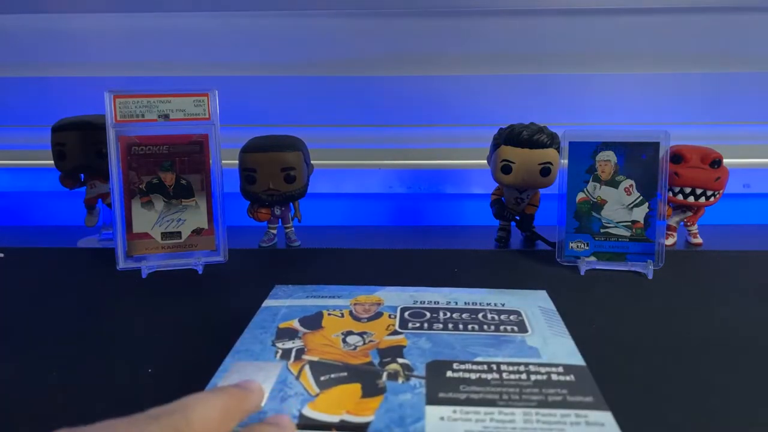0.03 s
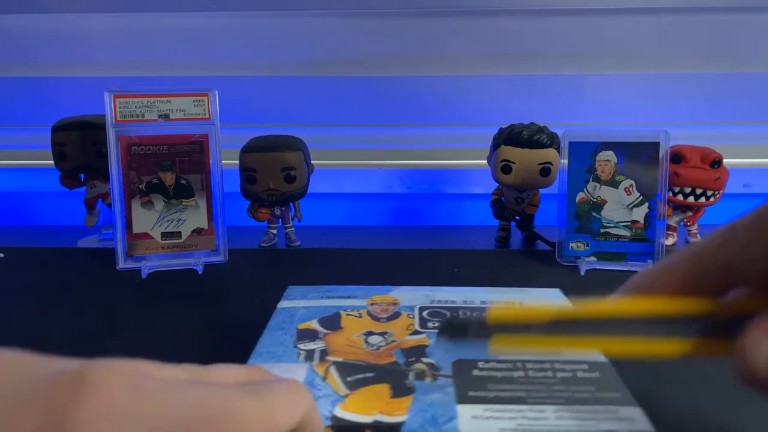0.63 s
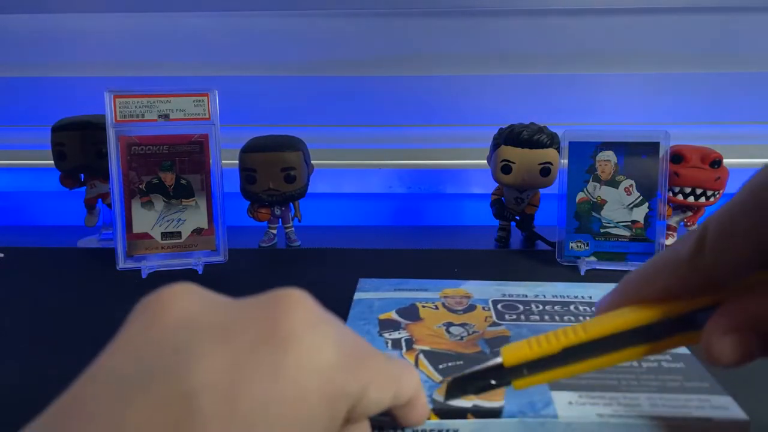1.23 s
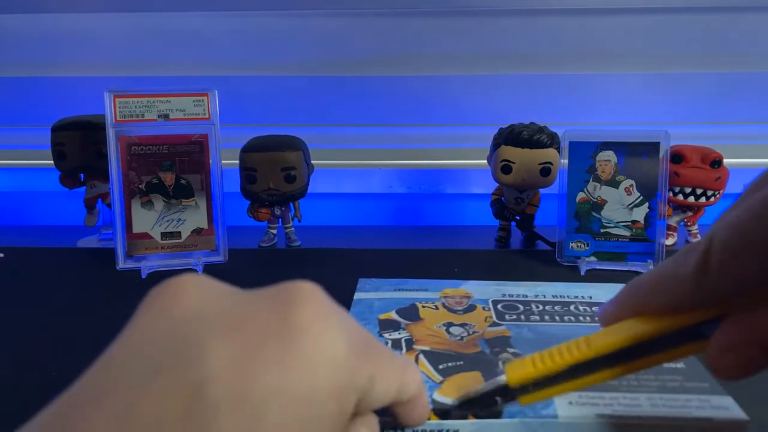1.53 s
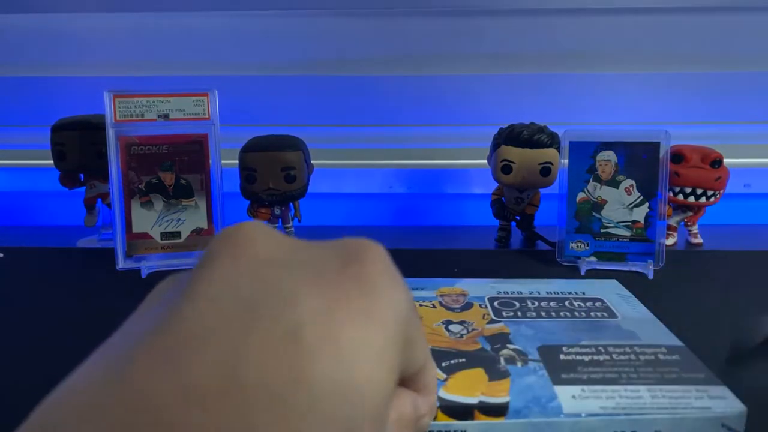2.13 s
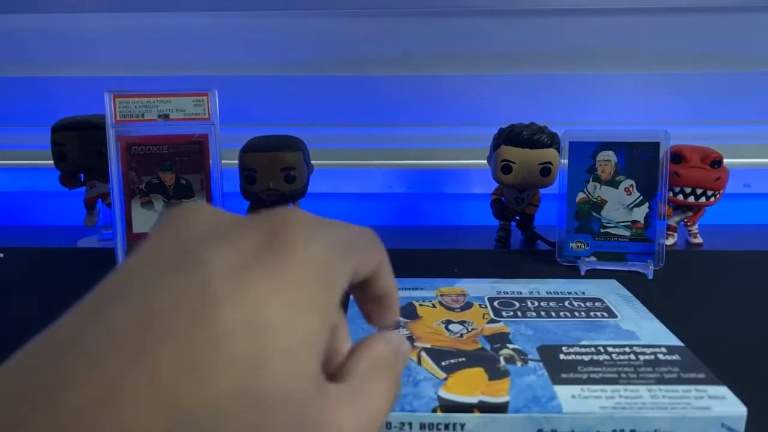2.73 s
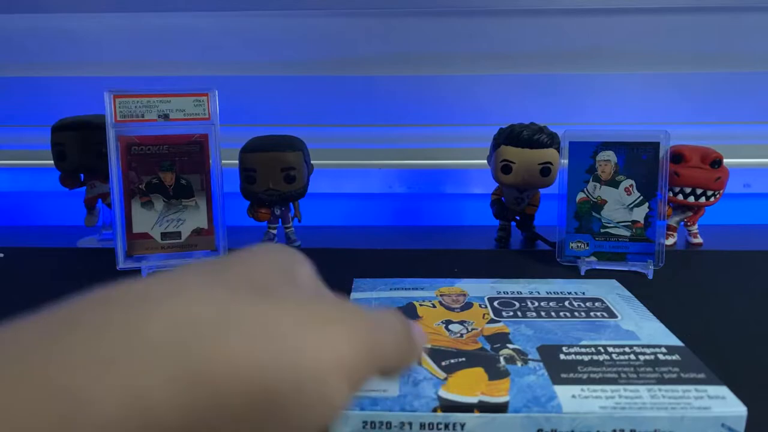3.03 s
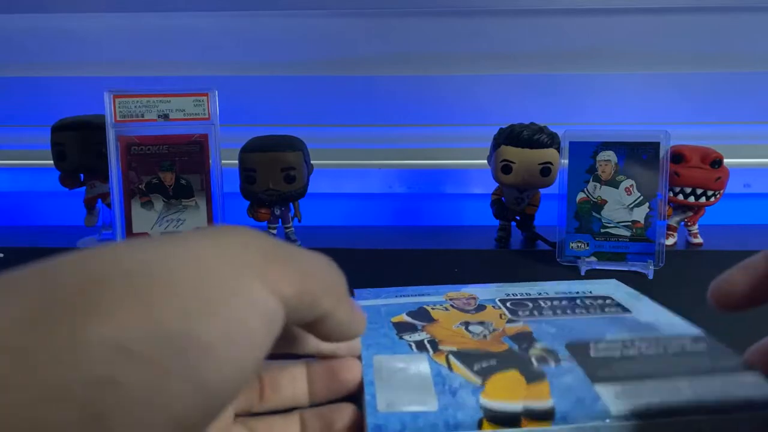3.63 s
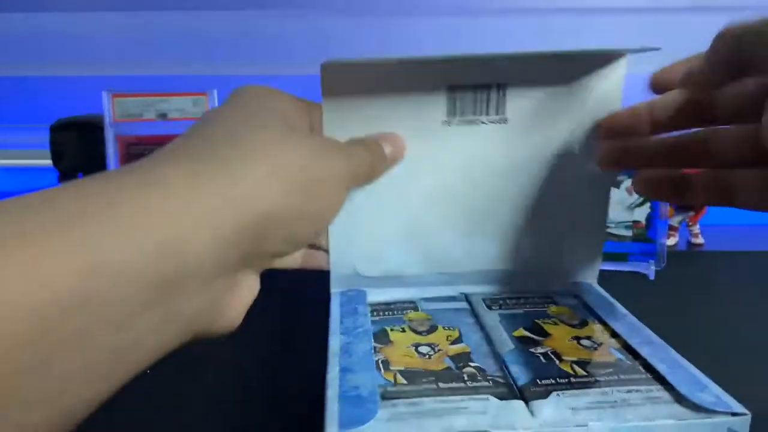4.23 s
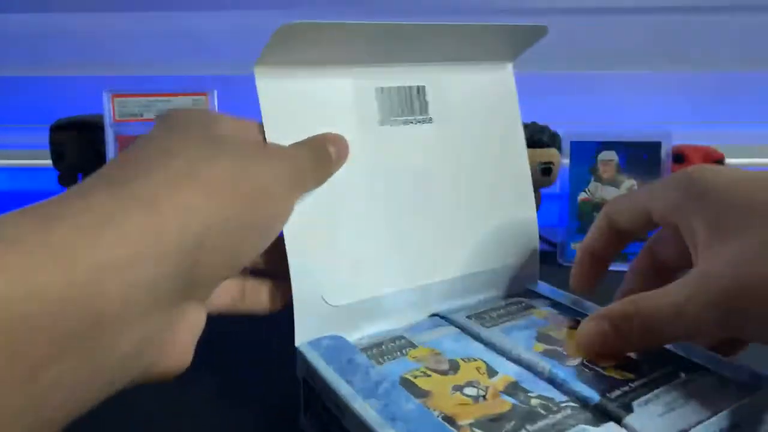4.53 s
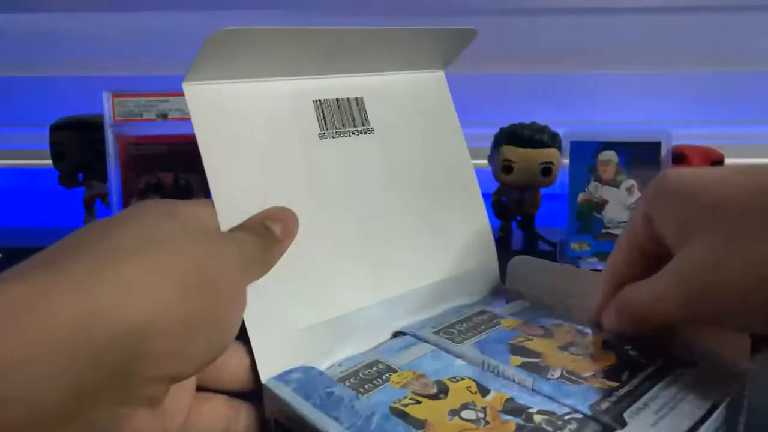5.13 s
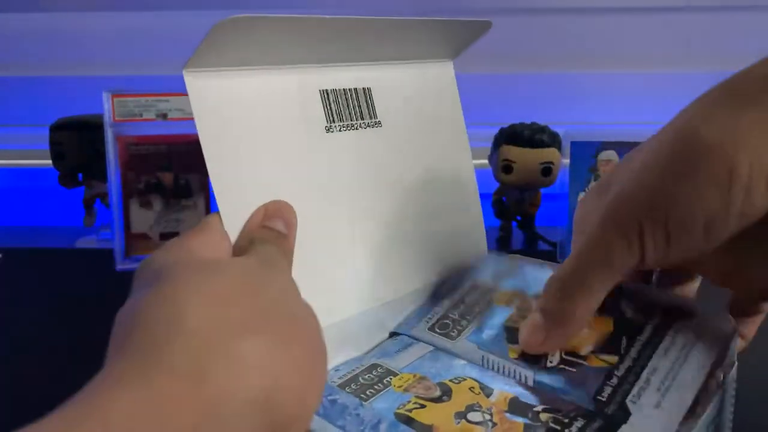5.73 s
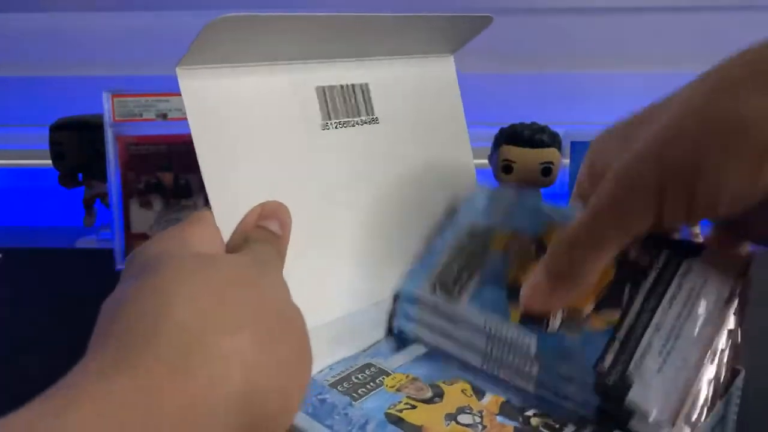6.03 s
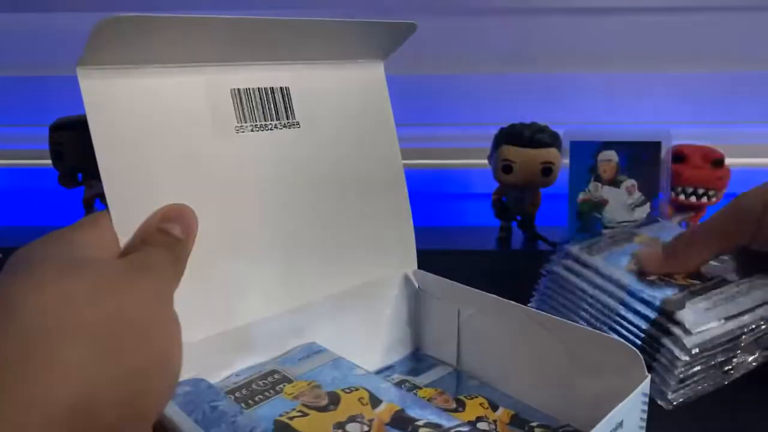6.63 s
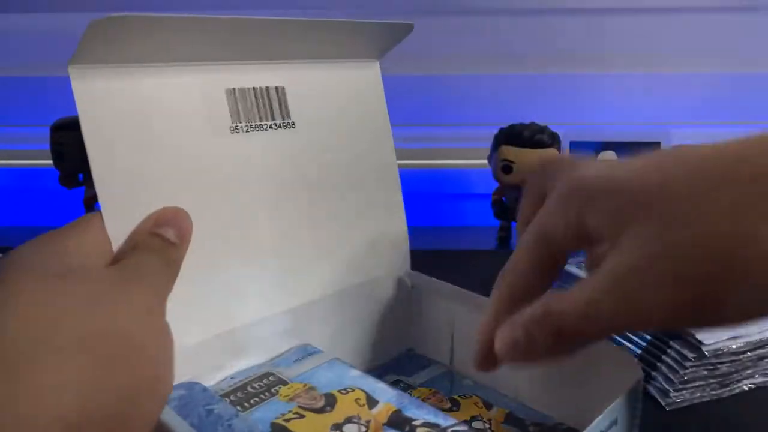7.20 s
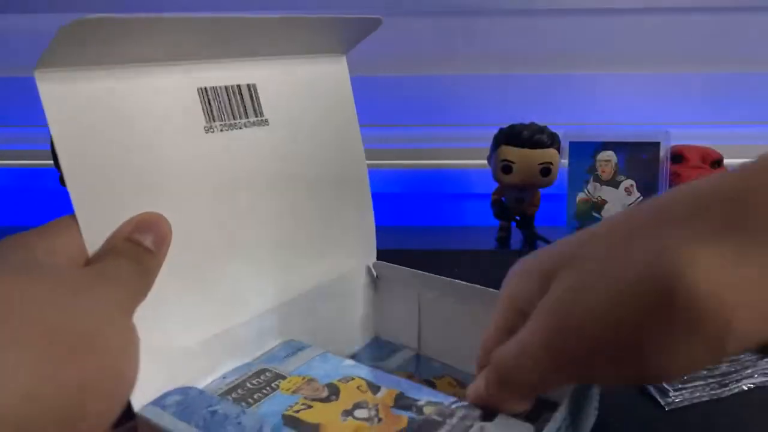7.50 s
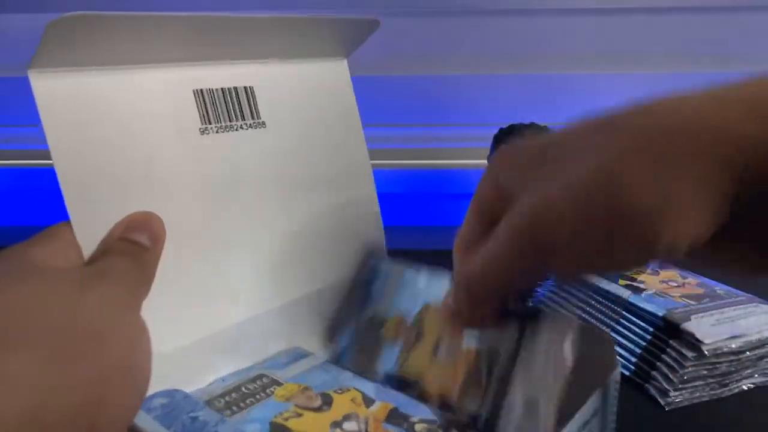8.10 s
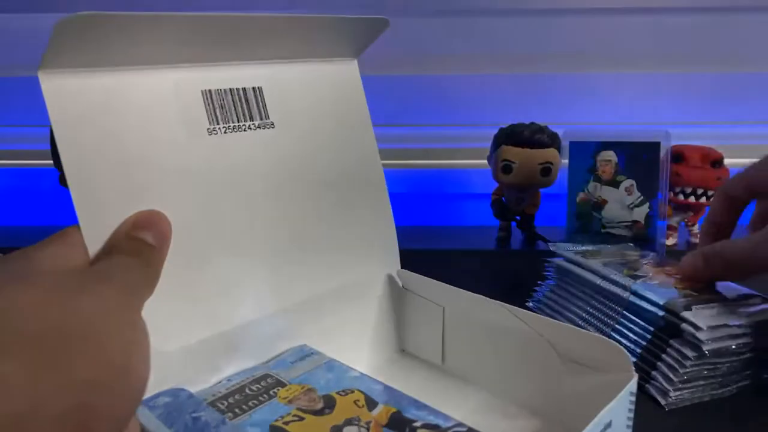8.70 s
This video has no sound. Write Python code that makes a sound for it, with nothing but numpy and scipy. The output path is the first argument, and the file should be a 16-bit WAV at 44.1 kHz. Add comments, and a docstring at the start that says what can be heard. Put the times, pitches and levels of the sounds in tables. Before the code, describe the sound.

A utility knife's slider ticks out over its notches, the blade makes a short slit, and it retracts in a quick run of clicks. Loud cardboard snaps, a scrape and low thumps follow as a box is opened on a desk. Foil packs then slide against its walls and crinkle as two stacks are lifted out and laid aside. Everything is heard close up over a faint, low room tone.

```python
"""A cardboard box of trading cards is opened on a desk, close up, in a small room.
Fingers rub and tap it; a utility knife ratchets out over its notches, slits the seal and clicks back.
The cardboard cracks, its panels ring and the lid scrapes open in grains of stick-slip friction.
Two stacks of foil packs are dragged out, ticking as their creases buckle, and set down with soft thumps."""
import sys
import numpy as np
from scipy import signal
from scipy.fft import next_fast_len
from scipy.io import wavfile

SR = 44100
rng = np.random.default_rng(int(sys.argv[2]) if len(sys.argv) > 2 else 0)


def wav_out(sig):
    """Save sig, one row per channel (or a flat mono array), as 16-bit PCM at SR to the path in sys.argv[1]."""
    wavfile.write(sys.argv[1], SR, np.round(np.clip(np.atleast_2d(sig).T, -1, 1) * 32767).astype(np.int16))


N = 386316
AGE = np.arange(2 ** 13) / SR  # seconds since a hit
CONTROL_T = np.arange(0, N, 32) / SR  # coarse clock for gestures, in seconds


def from_db(db):
    """Decibels to gain."""
    return 10 ** (np.asarray(db) / 20)


def rms_one(x):
    """Scale to rms 1."""
    return x / np.sqrt(np.mean(x ** 2) + 1e-20)


def add(out, start_s, hit, level_db):
    """Mix in a hit; its level is its energy spread over 5 ms."""
    i = int(start_s * SR)
    hit = hit * from_db(level_db) * np.sqrt(.005 * SR / np.sum(hit ** 2))
    out[i:i + len(hit)] += hit[:N - i]


def band(x, low_hz, high_hz, order=2):
    """Butterworth band-pass."""
    sos = signal.butter(order, [low_hz, min(high_hz, .45 * SR)], "band", fs=SR, output="sos")
    return signal.sosfilt(sos, x)


def colour(x, curve, tilt_db=0):
    """Minimum-phase EQ, tilted by tilt_db per octave above 1 kHz."""
    size = next_fast_len(len(x))
    octave = np.log2(np.abs(np.fft.fftfreq(size, 1 / SR)) + 1)
    hz, db = np.transpose(curve)
    gain_db = np.interp(octave, np.log2(hz), db) + tilt_db * np.clip(octave, np.log2(1000), None)
    response = np.exp(np.conj(signal.hilbert(np.log(from_db(gain_db)))))
    return np.fft.ifft(np.fft.fft(x, size) * response).real[:len(x)]


def resonate(x, modes):
    """Add resonant peaks to a sound."""
    return x + sum(from_db(db) * signal.lfilter(*signal.iirpeak(hz, hz / width, fs=SR), x)
                   for hz, width, db in modes)


def resonate_during(x, span_s, modes):
    """Hold a sound near rms 1, with extra resonances during a span."""
    t = np.arange(N) / SR
    return np.where((t > span_s[0]) & (t < span_s[1]), rms_one(resonate(x, modes)), rms_one(x))


def burst(length_s, rattle_db):
    """A short spit of noise, then a rattle that dies away."""
    envelope = np.exp(-(AGE / length_s) ** 2) + from_db(rattle_db) * np.exp(-AGE / 0.0067)
    return rng.standard_normal(len(AGE)) * envelope


def mode(hz, t60_s):
    """A dying sine."""
    return np.sin(2 * np.pi * hz * AGE) * from_db(-60 * AGE / t60_s)


def drift(per_s):
    """Random wander of rms 1."""
    knots = rng.standard_normal(int(N / SR * per_s) + 2)
    return rms_one(np.interp(np.arange(N) / SR * per_s, np.arange(len(knots)), knots))


def per_sample(control):
    """A gesture's value at every sample."""
    return np.interp(np.arange(N) / SR, CONTROL_T, control)


def stroke(start_s, length_s, swell_db, attack_s, release_s):
    """Envelope of one stroke: attack, a hold that swells or fades, release."""
    age = np.clip(CONTROL_T - start_s, 0, None)
    attack = 1 - np.exp(-age / attack_s)
    hold = from_db(swell_db * (np.minimum(age / length_s, 1) - .5))
    release = np.exp(-np.clip(age - length_s, 0, 1) / release_s)
    return attack * hold * release


def pressing(strokes, attack_share, release_s, body_db, hiss_db):
    """The power that strokes feed into the friction's body, scrape and hiss bands."""
    power = 0
    for start_s, length_s, db, swell_db, bright_db in strokes:
        gains = from_db([db + body_db - bright_db, db, db + hiss_db + bright_db])
        envelope = stroke(start_s, length_s, swell_db, attack_share * length_s, release_s)
        power = power + np.outer(gains, envelope) ** 2
    return power


# EQ of the room tone: freq_hz, gain_db
ROOM_TONE_EQ = [(15, -25.5), (25, -10), (60, 8), (130, -2), (180, -6.5), (249, -4.5), (373, -8.5),
                (988, -24.5), (1400, -13.5), (1890, -27.5), (2610, -26.5), (8830, -38), (12200, -39),
                (16000, -47)]


def room_tone(level_db):
    """A steady bed of dark noise."""
    return from_db(level_db) * rms_one(colour(rng.standard_normal(N), ROOM_TONE_EQ))


# fader ride of the brushing, ahead of its soft ceiling: time_s, level_db
BRUSH_RIDE = [(0.0, -63), (0.34, -67), (0.63, -57), (1.56, -78), (2.07, -49), (2.66, -69), (2.9, -56),
              (3.1, -70.5), (3.73, -58.5), (3.85, -57.5), (5.12, -58), (6.0, -47), (6.24, -58), (6.71, -64),
              (6.93, -70.5), (7.27, -68), (7.46, -55.5), (7.78, -52), (8.05, -41), (8.29, -53.5),
              (8.76, -66)]


def brushing(ceiling_db=-55.5):
    """Friction power of hands and sleeves, which never quite stop brushing."""
    ride_db = np.interp(CONTROL_T, *np.transpose(BRUSH_RIDE))
    contact = 1 / np.hypot(from_db(-ride_db), from_db(-ceiling_db))
    return np.outer(from_db([-0.5, -3.5, -2.5]), contact) ** 2  # body, scrape, hiss


# finger strokes on the box: start_s, length_s, level_db, swell_db, brightness_db
FINGER_RUBS = [(0.0, 0.034, -43.5, -1, 0), (0.26, 0.13, -62.5, 2, -3), (0.63, 0.31, -58.5, -6, 2),
               (0.87, 0.025, -50, -1, 1), (0.92, 0.26, -65, -4, -6), (1.235, 0.018, -50.5, 0, 3.5),
               (1.3, 0.27, -70, 2, -11), (1.62, 0.048, -42.5, -14, -0.5), (1.68, 0.27, -60, 21, -2.5),
               (2.22, 0.32, -59, -0.5, -1), (2.79, 0.12, -50.5, 8, -6.5), (3.345, .04, -60, -1, -5),
               (3.503, 0.022, -43.5, -8.5, -1), (3.53, 0.085, -62, 8, -3), (3.635, 0.031, -47, -5, 0),
               (3.86, 0.11, -59, -1, 3), (3.96, 0.1, -46, -0.5, 3), (4.2, 0.14, -50, -9, 1),
               (4.56, 0.049, -52, -5, 0), (4.62, 0.02, -45.5, 1.5, 1.5), (4.765, 0.021, -48, -3, 2),
               (4.918, 0.027, -51.5, 0, -1), (4.96, 0.1, -54.5, 0, 1), (5.108, 0.034, -42.5, -5.5, 0),
               (7.281, 0.041, -43, -0.5, -2.5), (7.34, 0.17, -46, -3, 0)]


def finger_rubs():
    """Friction power of fingers on cardboard: full body, little hiss."""
    return pressing(FINGER_RUBS, attack_share=.12, release_s=0.028, body_db=3, hiss_db=-7.5)


# EQ of rubbed cardboard: freq_hz, gain_db
RUB_EQ = [(59, -57), (100, 8), (160, 0), (295, 1.5), (524, -2), (801, -4), (1010, -8.5), (1130, -3),
          (1680, -5.5), (2320, -7), (3120, -12), (8280, -13), (11200, -15), (15000, -26), (16000, -24.5)]
# resonances of the box's hollow, the shut box, the knife and a rasping stack: freq_hz, width_hz, gain_db
BOX_MODES = [(302, 80, -9.5), (660, 49, -16), (834, 86, -0.5)]
SHUT_BOX_MODES = [(630, 134, 7)]
KNIFE_MODES = [(2780, 240, 5), (6100, 260, 6), (8700, 380, 3)]
STACK_MODES = [(2300, 380, 2), (3980, 510, 2.5)]


def friction(body_gain, scrape_gain, hiss_gain):
    """Sliding surfaces catch and slip in dense grains that sound the box, the blade and the wrappers."""
    cutting_s, prising_s, rasping_s = (1.75, 2.3), (2.6, 3.2), (7.8, 8.03)
    slips_per_s = 1800
    slips = (rng.random(N) < slips_per_s / SR) * rng.choice([-1, 1], N)
    slips = slips * from_db(3.5 * np.minimum(rng.exponential(1, N), 4.5))  # a few grains stick out
    grains = (rms_one(slips) + rng.standard_normal(N)) * from_db(1.5 * drift(per_s=130))
    rub = colour(wandering(grains, depth_db=2.5), RUB_EQ)
    rub = resonate(rub, BOX_MODES)
    rub = resonate_during(rub, rasping_s, STACK_MODES)
    body = resonate_during(band(rub, 120, 720, order=3), prising_s, SHUT_BOX_MODES)
    scrape = resonate_during(band(rub, 700, 3500, order=3), cutting_s, KNIFE_MODES)
    hiss = resonate_during(band(rub, 3500, 17000, order=3), cutting_s, KNIFE_MODES)
    return body_gain * body + scrape_gain * scrape + hiss_gain * hiss


def wandering(x, depth_db):
    """As the contact point moves, the sheet's resonances swell and fade, each on its own."""
    edges_hz = np.geomspace(200, 8000, 21)
    return x + sum(band(x, low, high, order=1) * (from_db(depth_db * drift(per_s=26)) - 1)
                   for low, high in zip(edges_hz, edges_hz[1:]))


def bend(hz, t60_s):
    """A bending mode builds up over a cycle, so the low ones speak last."""
    return mode(hz, t60_s) * (1 - np.exp(-(AGE * hz / .9) ** 2))


# modes of a cardboard panel: pitch_ratio, gain_db, decay_ratio
PANEL_MODES = [(.29, -20, 0.51), (.51, -11.5, 1.1), (.74, -5.5, 0.75), (1, 5, 0.36), (1.17, -3, 0.59),
               (1.55, -16.5, .5)]
# EQ of cracking fibres: freq_hz, gain_db
CRACK_EQ = [(200, -24), (900, -0.5), (1700, 1.5), (2500, 0), (3300, -6), (4500, -6.5), (7000, -10),
            (11500, -15.5), (16000, -25)]


def snap(panel_db, hz, crack_db, tilt_db, t60_s=0.029):
    """Fibres crack and the freed panel swings, a little differently each time; gives sound and level."""
    swing = 0
    for ratio, db, decay_ratio in PANEL_MODES:
        strike = from_db(db + rng.normal(0, 1.2)) * rng.choice([-1, 1])
        swing = swing + strike * bend(hz * ratio, t60_s * decay_ratio)
    crack = colour(burst(0.0024, rattle_db=-9), CRACK_EQ, tilt_db)
    panel_gain, crack_gain = from_db([panel_db, crack_db])
    level_db = 20 * np.log10(np.hypot(panel_gain, crack_gain))
    return panel_gain * rms_one(swing) + crack_gain * rms_one(crack), level_db


# cardboard hits: start_s, panel_db, pitch_hz, crack_db, tilt_db_per_octave
SNAPS = [(0.03, -34.5, 602, -38.5, -1), (0.2737, -33, 700, -48.5, 0), (0.9342, -37.5, 664, -45.5, -9),
         (1.2242, -28.5, 649, -21.5, 1), (1.3599, -38.5, 886, -38.5, -2.5), (1.3944, -41, 313, -32, 3.5),
         (1.4704, -42, 301, -52, -3.5), (1.6139, -22.5, 685, -13, 1), (1.6239, -32, 623, -25, 4),
         (1.9988, -8, 696, -9, -4.5), (2.033, -23.5, 630, -20.5, 0), (2.0407, -25, 327, -19.5, 9),
         (2.643, -27.5, 653, -35.5, -3.5), (2.7332, -11.5, 592, -10.5, 0.5), (2.7457, -15.5, 592, -16, 2),
         (2.886, -32.5, 680, -36.5, -4), (2.9069, -11.5, 610, -11.5, 2), (2.918, -23, 619, -19.5, 3.5),
         (2.9579, -13.5, 608, -8.5, -2.5), (2.9896, -26, 623, -23.5, 2.5), (3.429, -40, 397, -45.5, -1.5),
         (3.748, -24.5, 813, -29, 7), (3.823, -19, 729, -15.5, -0.7), (3.8274, -19, 916, -21, -11.5),
         (4.13, -66, 830, -41.5, 1.5), (4.2954, -36, 332, -31, -0.5), (4.5685, -39, 710, -40.5, -9),
         (4.635, -36, 383, -41, -11.5), (4.784, -42, 865, -38, -9.5), (4.888, -44, 398, -51.5, -0.2),
         (4.9247, -48, 1087, -38, -10), (5.1129, -36, 384, -49, 7), (6.0721, -32, 820, -24, 0.5),
         (6.1383, -28, 820, -23, -0.5), (6.203, -29, 326, -37, 0), (6.8229, -53, 330, -33.5, 0.5),
         (6.9222, -44, 835, -47.5, -5.5), (6.9826, -48.5, 394, -49, -1), (7.2954, -30.5, 640, -46.5, 8),
         (7.3, -29, 332, -40, -10), (7.3752, -25, 350, -25.5, -4), (7.4477, -32.5, 770, -44, 0),
         (8.036, -24, 767, -23.5, 6.5), (8.049, -25, 816, -39, 1.4), (8.128, -30, 780, -30, -5)]


def cardboard():
    """The box snaps and knocks as it is handled and prised open."""
    out = np.zeros(N)
    for start_s, panel_db, hz, crack_db, tilt_db in SNAPS:
        add(out, start_s, *snap(panel_db, hz, crack_db, tilt_db))
    return out


def notch():
    """One light tick of the slider, ringing the knife's lowest mode."""
    return resonate(band(burst(0.0008, rattle_db=-16), 2800, 6000, order=3), KNIFE_MODES[:1])


# clicks of slider and blade: start_s, level_db
KNIFE_CLICKS = [(0.3092, -43), (0.645, -24.5), (0.648, -16.5), (0.6909, -29.5), (0.7535, -28),
                (0.815, -38.5), (0.8778, -37.4), (1.595, -42.5), (1.813, -33), (1.9021, -21.5),
                (1.9192, -27.5), (2.207, -25), (2.3275, -19), (2.3465, -13), (2.35, -12), (2.358, -12.5),
                (2.3617, -14), (2.3672, -15), (2.4242, -27.5), (2.539, -34)]
# harder clicks last longer: level_db, length_s
CLICK_LENGTHS = [(-26.5, .0016), (-14.5, .003)]
# EQ of a knife click: freq_hz, gain_db
KNIFE_EQ = [(290, -54.5), (500, -48), (1140, -23), (2100, -13.5), (2690, -2.5), (3390, -8), (4150, -4),
            (5710, -7.5), (7100, -7.5), (8330, -11), (12000, -10.5), (15100, -17.5), (16000, -23)]


def knife_clicks():
    """The slider catches, jumps over its notch and rings the knife's lowest mode."""
    out = np.zeros(N)
    for start_s, db in KNIFE_CLICKS:
        length_s = np.interp(db, *np.transpose(CLICK_LENGTHS))
        click = colour(burst(length_s, rattle_db=-8), KNIFE_EQ)
        add(out, start_s, click + from_db(-8) * resonate(click, KNIFE_MODES[:1]), db)
        add(out, start_s - .005, notch(), db - 23)  # the light catch before the jump
    return out


# runs of the slider: start_s, end_s, notches_per_s, first_db, last_db
RATCHETS = [(0.324, .45, 42, -57.5, -57), (0.484, 0.585, 60.5, -54, -44), (0.596, 0.64, 57, -46, -37),
            (2.278, 2.327, 66, -47, -36.5)]


def ratchet():
    """The slider creeps over its notches in quick, uneven ticks."""
    out = np.zeros(N)
    for start_s, end_s, per_s, first_db, last_db in RATCHETS:
        for tick_s in np.arange(start_s, end_s, 1 / per_s):
            db = np.interp(tick_s, [start_s, end_s], [first_db, last_db])
            add(out, tick_s + rng.normal(0, 0.0032), notch(), db + rng.normal(0, 1.8))
    return out


# fingers feeling for a grip: start_s, end_s
GRIPS = [(1.0, 1.6), (3.3, 3.7), (4.1, 5.3), (6.9, 7.4)]


def taps(per_s=7):
    """Light, dull fingertip taps at random moments and places on the box."""
    out = np.zeros(N)
    for start_s, end_s in GRIPS:
        for _ in range(round(per_s * (end_s - start_s))):
            force_db = rng.normal(0, 2)
            tap_s = rng.uniform(start_s, end_s)
            hz = rng.uniform(300, 800)
            add(out, tap_s, *snap(force_db - 49.5, hz, crack_db=force_db - 50, tilt_db=-6.5))
    return out


# cuts through the seal: start_s, length_s, level_db, swell_db, brightness_db
BLADE_CUTS = [(1.78, 0.014, -51.5, 0, 5), (1.9, 0.13, -38.5, 0.1, 0), (2.07, 0.12, -43.5, 2.2, -1.5)]


def blade_cuts():
    """Friction power of the blade slitting the seal: a fast bite and a long release."""
    return pressing(BLADE_CUTS, attack_share=.05, release_s=0.09, body_db=-2.5, hiss_db=-4.5)


# box and stacks bumping the desk: start_s, level_db, pitch_hz
THUMPS = [(1.999, -24.5, 197.4), (2.038, -27, 81.6), (2.733, -29.5, 204.4), (2.906, -33, 105),
          (3.833, -18, 74.5), (3.852, -21.5, 62), (4.063, -29, 58.2), (4.305, -24, 72),
          (4.355, -31.5, 86.5), (4.802, -31.5, 62), (5.103, -32.5, 159), (5.266, -33, 62.5),
          (6.146, -33, 100), (6.828, -27, 86), (7.287, -36, 196), (7.675, -34.5, 82), (8.191, -32, 75)]


def thumps():
    """Soft, heavy contacts: the desk answers with a low note and a dull puff."""
    out = np.zeros(N)
    for start_s, db, hz in THUMPS:
        note = mode(hz, t60_s=0.11) * (1 - np.exp(-AGE / 0.0044))
        puff = band(burst(0.015, rattle_db=-2.5), 60, 300)
        add(out, start_s, rms_one(note) + from_db(-5) * rms_one(puff), db)
    return out


# drags of the lid or a stack: start_s, length_s, level_db, swell_db, brightness_db
SLIDES = [(2.962, 0.051, -30.5, -10, -4), (3.728, 0.057, -23, -7.5, -1.5), (3.8, .05, -35.5, -12, -5),
          (5.13, 0.17, -45.5, -9, -0.5), (5.3, 0.076, -40, 2, -5.5), (5.39, 0.3, -48, 3, -8),
          (5.665, 0.15, -31, 3.5, 0.5), (5.795, 0.071, -26.5, -0.5, -0.5), (5.87, 0.032, -28.5, -1, -3),
          (5.91, 0.096, -43, -5, -4), (6.06, 0.094, -31, 5, -2.5), (6.193, 0.018, -33, 3.5, -6),
          (6.62, 0.224, -52.5, 4, 4), (7.425, 0.047, -41, 6, -1), (7.48, .3, -49.5, 3, -6),
          (7.78, 0.246, -35, 2.5, 1), (8.028, 0.037, -27.5, -4.5, -3), (8.115, 0.063, -31.5, -2, -1.5),
          (8.232, 0.038, -35, -6.5, 8.5), (8.55, 0.18, -57, 7.5, 1)]


def slides():
    """Friction power of lid and packs against the box's walls: thin body, quick stop."""
    return pressing(SLIDES, attack_share=0.15, release_s=0.0179, body_db=-8.5, hiss_db=-4)


def flap(start_s):
    """The lid's flap springs free with a crack and a twang."""
    out = np.zeros(N)
    add(out, start_s, bend(hz=796, t60_s=.058), level_db=-20)
    crack = colour(burst(0.0046, rattle_db=0), CRACK_EQ, tilt_db=2.5)
    add(out, start_s, crack, level_db=-25)
    return out


def crease(hz):
    """A foil crease flips with a tick a few cycles long and rings its facet."""
    tick = burst(4.3 / hz, rattle_db=-18)
    ring = rms_one(mode(hz * .93, t60_s=.005))
    facet = rms_one(band(tick, hz / 1.58, hz * 1.44)) + from_db(-2.5) * ring
    return facet + from_db(-8) * rms_one(band(tick, 1000, 12000, order=1))


# featured creases in the wrappers: start_s, level_db, pitch_hz
CRINKLES = [(5.2338, -31, 10100), (5.332, -24, 3080), (5.341, -19, 2880), (5.361, -22.5, 2730),
            (5.442, -40, 3730), (5.7227, -41, 2240), (5.945, -25, 11000), (6.0003, -42, 7500),
            (6.12, -30.5, 4900), (6.143, -26, 2200), (6.2776, -41, 3640), (6.616, -35, 6260),
            (6.679, -42, 8100), (6.757, -45, 2720), (7.7312, -40, 2090), (7.886, -44, 4020),
            (7.951, -33, 4200), (8.121, -29, 2200), (8.257, -36, 6900), (8.549, -46, 3640),
            (8.652, -42.5, 6500), (8.6798, -45, 9500), (8.712, -40.5, 9100)]
# a stack flexing as it is dragged out or set down: start_s, end_s
FLEXES = [(5.85, 6.3), (6.6, 6.85), (7.8, 8.28), (8.55, 8.74)]


def foil(hiss_gain, creases_per_s=55):
    """Wrappers buckle: loud creases over a scatter of small ones that rides the friction's hiss."""
    loud, small = np.zeros((2, N))
    for start_s, db, hz in CRINKLES:
        add(loud, start_s, crease(hz), db)
    for start_s, end_s in FLEXES:
        length_s = end_s - start_s
        for when, tightness, strength in rng.random((int(creases_per_s * length_s), 3)):
            hz = 1770 * 2 ** (2.48 * tightness)  # tighter creases sound higher
            over_hiss_db = -5.5 + 9.5 * strength
            add(small, start_s + when * length_s, crease(hz), over_hiss_db)
    return loud + hiss_gain * small


# a stack being carried off: start_s, length_s, level_db
CARRIES = [(6.203, .4, -60), (8.275, 0.18, -58)]
# the peak in its hiss: freq_hz, width_hz, gain_db
CARRY_MODES = [(5200, 450, 22)]


def carrying():
    """A faint, narrow hiss while the arm swings a stack over to the mat."""
    gain = sum(from_db(db) * stroke(start_s, length_s, swell_db=0, attack_s=0.019, release_s=.04)
               for start_s, length_s, db in CARRIES)
    hiss = band(rng.standard_normal(N), 2500, 10900, order=1)
    return per_sample(gain) * rms_one(resonate(hiss, CARRY_MODES))


# early reflections off desk, shelf and walls: delay_s, gain_db
ECHOES = [(.0031, -27.5), (0.0098, -24), (.032, -24.5)]
# bands of the reverb tail: low_hz, high_hz, t60_s, gain_db
TAIL_BANDS = [(100, 900, 0.29, -15), (900, 14000, 0.37, -25), (4000, 16000, 0.09, -22)]


def room(x):
    """A small room adds a few near echoes and a short tail."""
    t = np.arange(SR // 2) / SR
    fade_in = 1 - np.exp(-(t / .007) ** 2)
    response = np.zeros(len(t))
    for low_hz, high_hz, t60_s, db in TAIL_BANDS:
        tail = rng.standard_normal(len(t)) * from_db(-60 * t / t60_s) * fade_in
        response += from_db(db) * band(tail / np.sqrt(np.sum(tail ** 2)), low_hz, high_hz)
    for delay_s, db in ECHOES:
        response[int(delay_s * SR)] += from_db(db)
    return x + signal.fftconvolve(x, response)[:N]


def scene():
    """All the handling in the room, over the room tone, in mono."""
    power = brushing() + finger_rubs() + blade_cuts() + slides()
    body_gain, scrape_gain, hiss_gain = [per_sample(gain) for gain in np.sqrt(power)]
    knife = knife_clicks() + ratchet()
    box = cardboard() + flap(start_s=4.0244) + taps()
    hits = knife + box + foil(hiss_gain) + thumps()
    textures = friction(body_gain, scrape_gain, hiss_gain) + carrying()
    return (room(hits + textures) + room_tone(level_db=-54))[None]


def record(dry):
    """Soft saturation rounds the loudest peaks and a steep low-pass trims the top."""
    ceiling, cutoff_hz = .8, 16100
    rounded = ceiling * np.tanh(dry / ceiling)
    return signal.sosfilt(signal.ellip(10, .2, 80, cutoff_hz, fs=SR, output="sos"), rounded)


dry = scene()
out = record(dry)
wav_out(out)
```